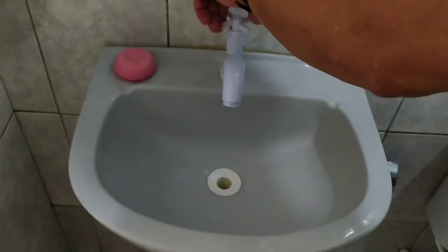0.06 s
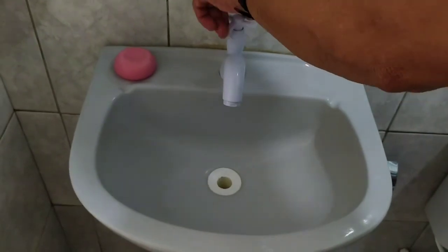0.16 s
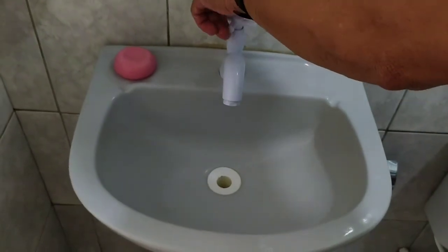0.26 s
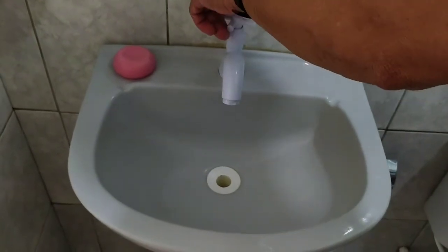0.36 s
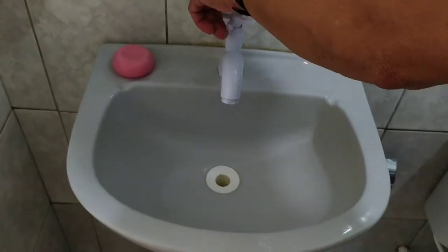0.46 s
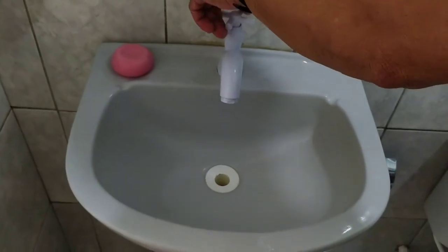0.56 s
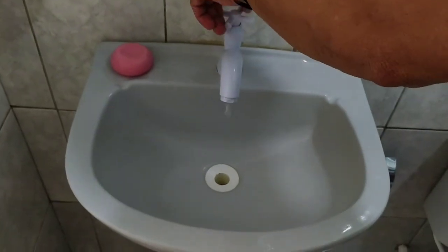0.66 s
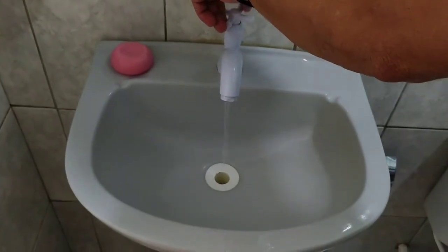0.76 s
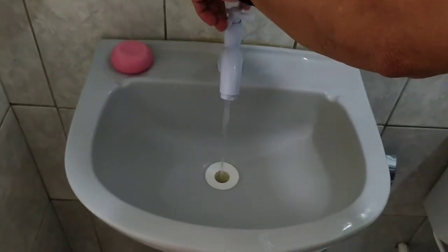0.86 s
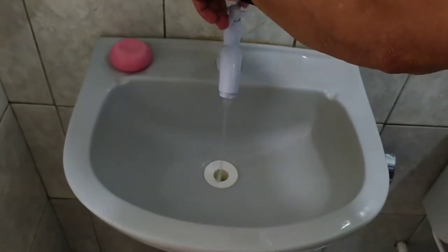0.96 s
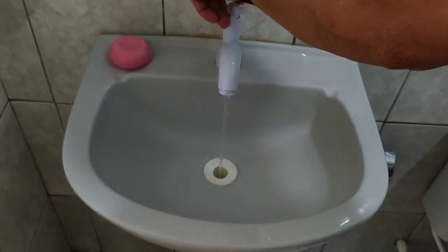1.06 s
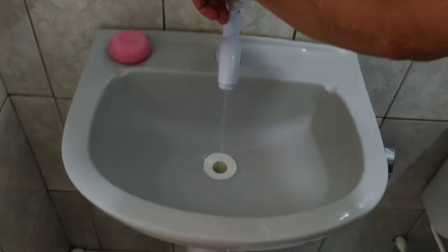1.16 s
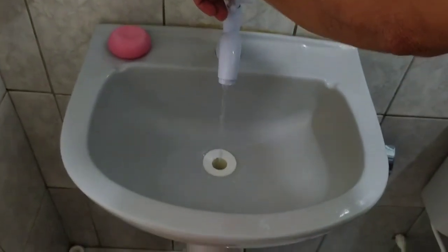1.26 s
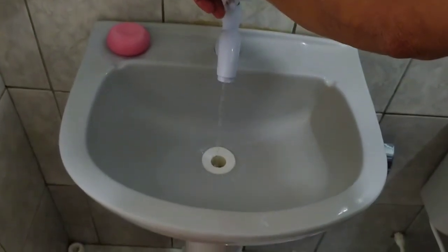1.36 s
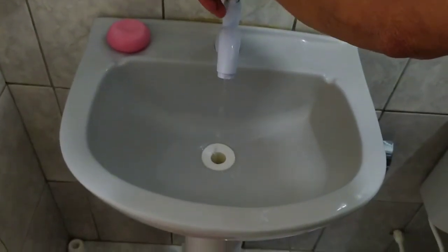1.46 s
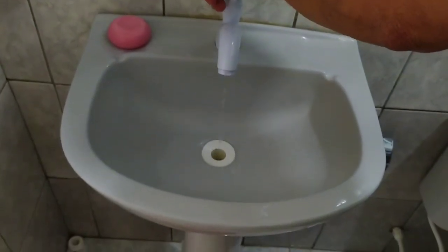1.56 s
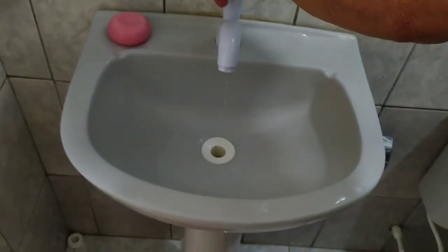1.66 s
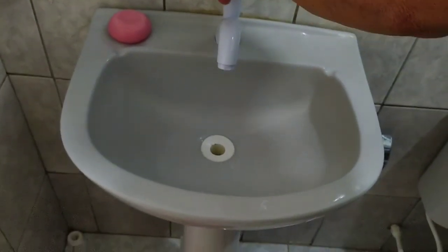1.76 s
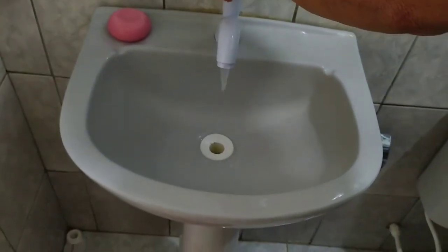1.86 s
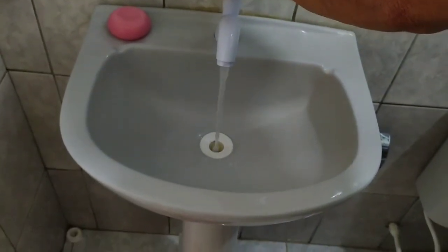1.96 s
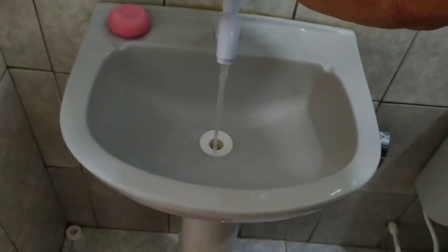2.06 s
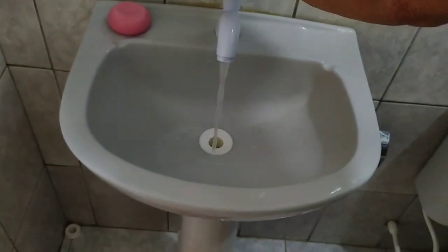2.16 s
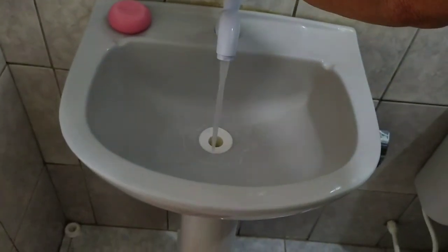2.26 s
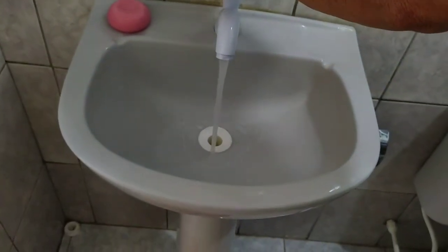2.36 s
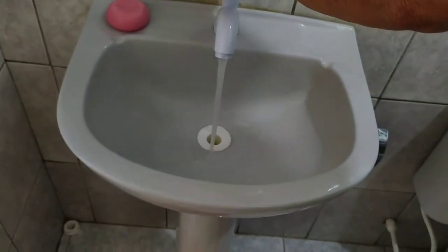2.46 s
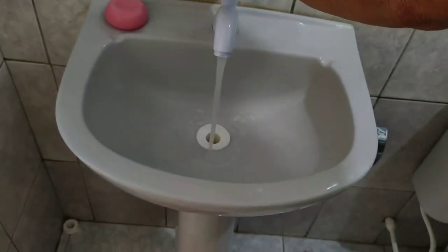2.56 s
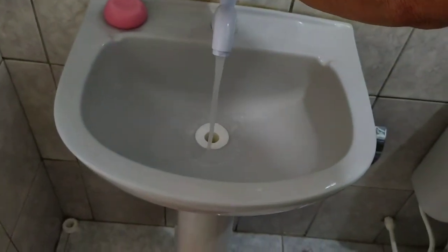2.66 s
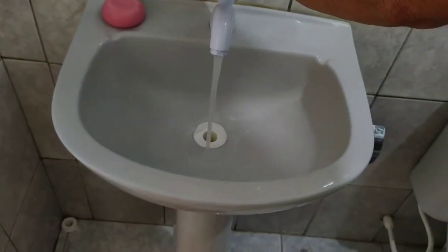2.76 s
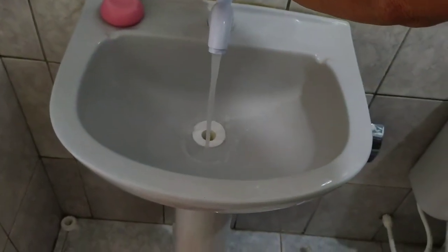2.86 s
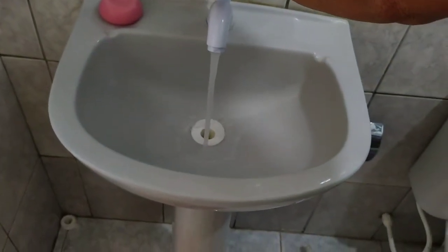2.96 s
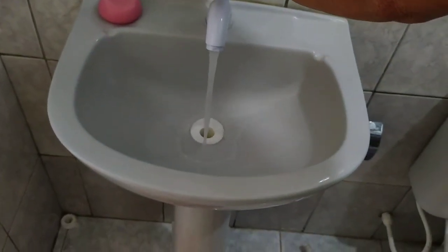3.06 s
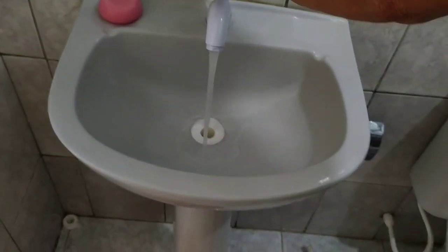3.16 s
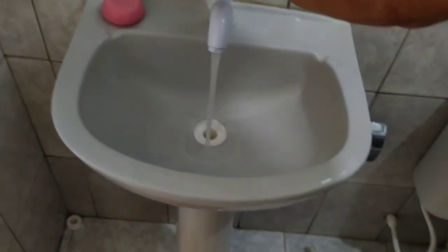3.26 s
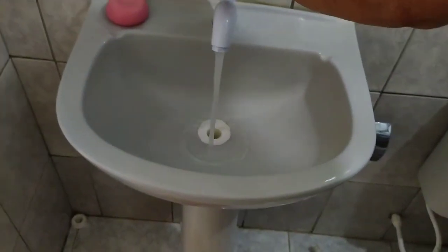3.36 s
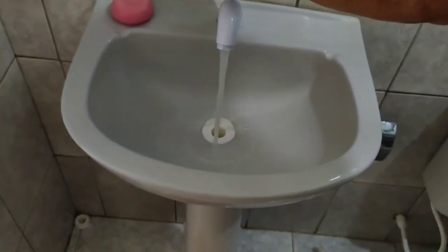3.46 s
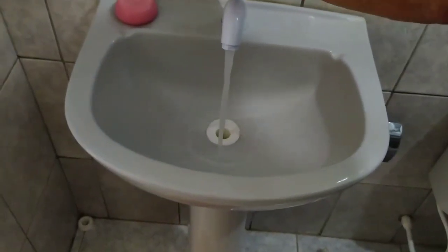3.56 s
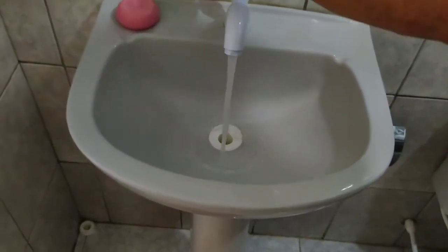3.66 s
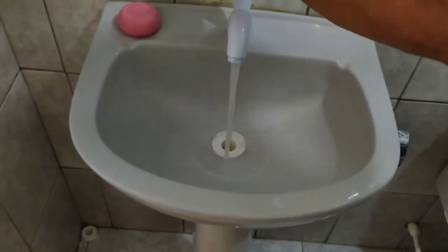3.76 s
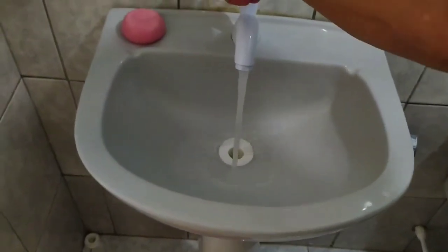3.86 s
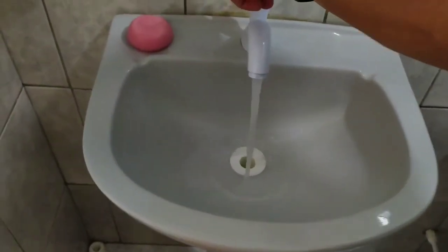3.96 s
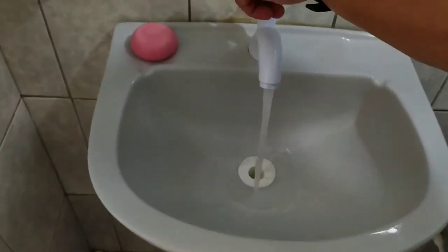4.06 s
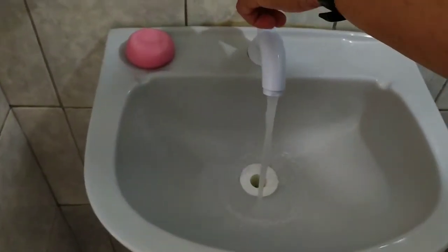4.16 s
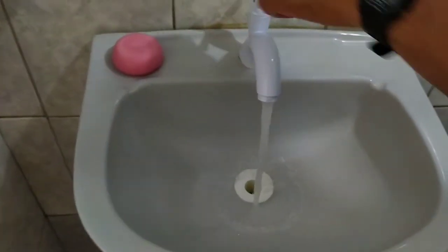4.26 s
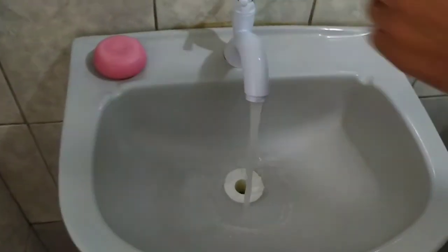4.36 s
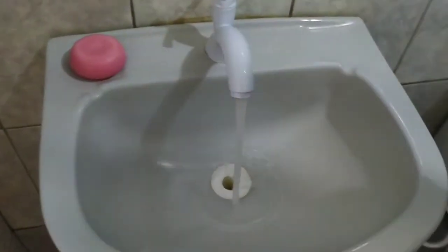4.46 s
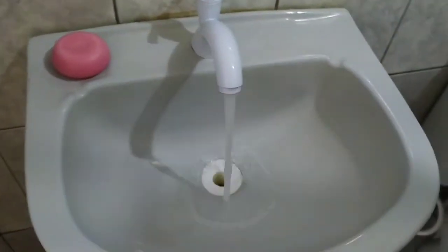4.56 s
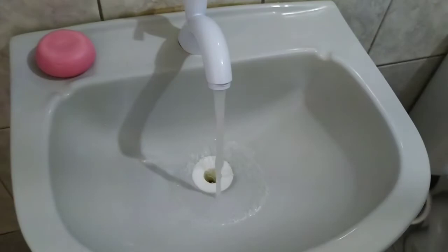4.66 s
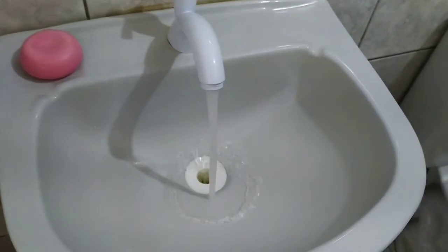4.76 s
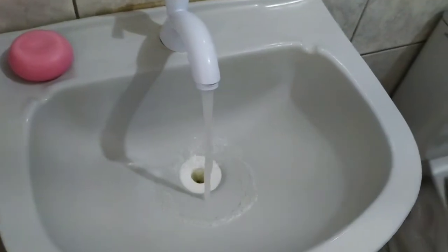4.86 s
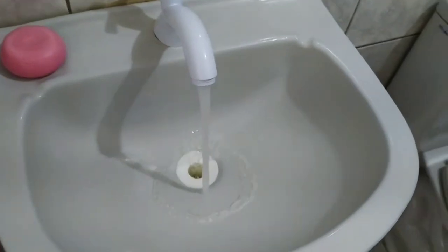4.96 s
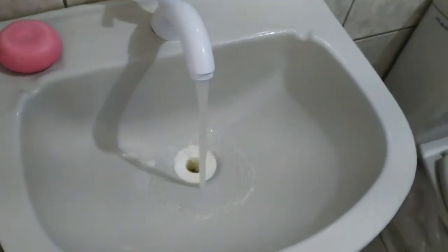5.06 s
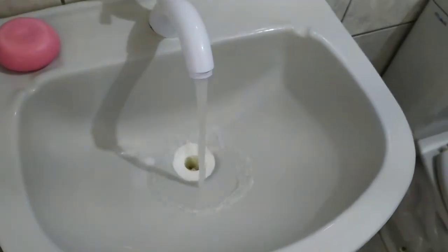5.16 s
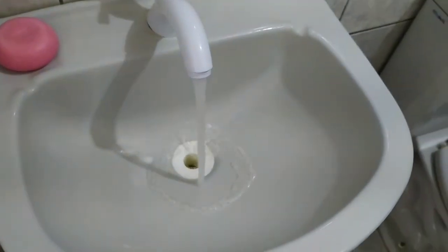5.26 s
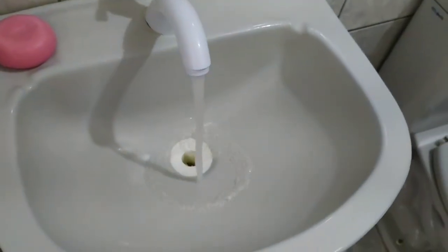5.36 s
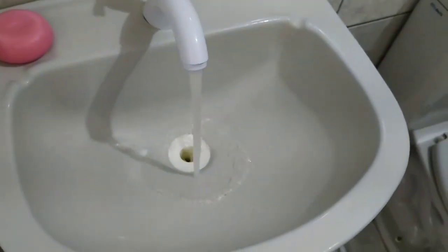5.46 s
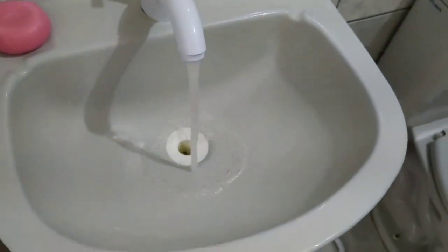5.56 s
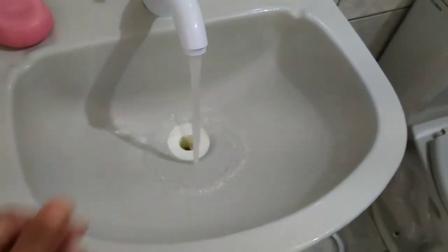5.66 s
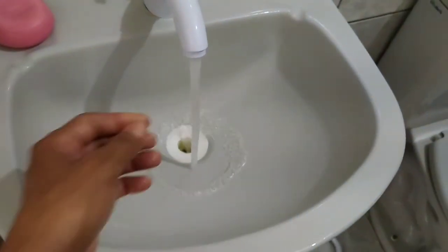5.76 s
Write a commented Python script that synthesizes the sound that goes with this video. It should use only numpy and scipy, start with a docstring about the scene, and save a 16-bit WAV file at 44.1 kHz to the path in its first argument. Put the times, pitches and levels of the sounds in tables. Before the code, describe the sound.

Close stereo view of a sink: first a quick, torn burst of hissing air with whistling pipe tones, then almost quiet trickling with isolated drips and spits. The water returns with a slap, becomes a crisp continuous patter, and strengthens after brief hollow tap rattles. Bubbles, glugs and dull bowl drumming sit beneath the bright spray. The hard-walled bathroom adds a short reflection; a low hum is barely heard.

```python
"""A new plastic tap is opened over a ceramic basin in a small tiled bathroom with a faint low hum.
First, trapped air spits out: torn noise excites pipe and nozzle resonances, and an air column sounds.
The water thins to a dribble, then builds to a jet: patter noise sizzles, bubbles splash and gurgle.
The tap judders in small ticks and short hollow swells; as it opens further, water washes over the bowl.
The full jet drums on the bowl, with slaps, plops and glugs; late on, one soft, low rub is heard."""
import sys
import numpy as np
from scipy import signal
from scipy.fft import rfft, irfft, next_fast_len
from scipy.io import wavfile
from scipy.ndimage import uniform_filter1d

SR = 44100
rng = np.random.default_rng(int(sys.argv[2]) if len(sys.argv) > 2 else 0)


def unload_audio(sound):
    """Save the sound as a 16-bit wav file, at the path given as the first command line argument."""
    columns = np.transpose(np.atleast_2d(sound))
    # keep every value between -1 and 1, then stretch to whole-number steps
    steps = np.round(np.clip(columns, -1, 1) * 32767)
    wavfile.write(sys.argv[1], SR, steps.astype(np.int16))


N = 256220  # length in samples

# All levels in the tables are relative; the layers are weighted again where they are mixed.
# Spectrum of the room tone. Each row: frequency in Hz, density in dB per Hz.
AIR_SPECTRUM = [(20, 11), (40, -9), (70, 5.5), (100, -7), (130, -53), (300, -50), (700, -27.5), (2000, -6),
                (5000, -18.5)]
# Course of a low hum in the room. Each row: time in seconds, level in dB.
HUM_LEVEL = [(0.0, -44.5), (0.7, -53), (0.93, -45.5), (2.4, -55.5), (2.55, -50)]
# Spectrum of a soft rub. Each row: frequency in Hz, density in dB per Hz.
RUB_SPECTRUM = [(25, -12), (70, 9), (130, -11), (300, -1), (600, 2), (1000, -15), (2000, -38)]
# Reverberation of the tiled walls. Each row: frequency in Hz, time to decay by 60 dB in seconds.
TILE_DECAY = [(150, 0.39), (1000, 0.24), (4000, 0.17), (14000, 0.035)]
# Likeness of left and right. Each row: frequency in Hz, correlation as a plain number.
LIKENESS = [(30, .4), (120, .9), (400, .93), (750, .72), (1300, .4), (1900, .25), (3300, .22), (5200, .3),
            (6700, .15), (7100, .82), (8600, .95), (10200, .95), (11300, .38), (15000, .2)]
# Level difference of the sides. Each row: frequency in Hz, left minus right in dB.
SIDE_DIFFERENCE = [(250, .5), (800, .5), (2000, 3.2), (3900, 2.8), (4800, 0), (6000, 1.3), (9500, -.7),
                   (10200, 2), (11200, 12), (12300, 11.5), (14000, 8), (15500, 9)]
# Lateness of the left side. Each row: frequency in Hz, lag in cycles.
LEFT_LAG = [(750, 0), (1300, .13), (2000, .25), (3300, .27), (4300, .47), (5400, .53), (6200, .9),
            (7000, 1)]
TOP_HZ = 15900  # band limit

# Puffs of trapped air leaving the spout. Each row: start in seconds, length in seconds,
# hiss level in dB, pipe level in dB, thump level in dB.
AIR_PUFFS = [(0.018, 0.037, -22, -28.5, -35.5), (0.054, 0.033, -16, -24, -52),
             (0.092, 0.025, -20, -26, -27), (0.16, 0.025, -24, -27.5, -46),
             (0.18, 0.0055, -17, -24.5, -33.5), (0.21, 0.053, -25, -30, -42), (0.27, 0.04, -37, -40, -46)]
PUFF_ATTACK_S, PUFF_RELEASE_S, THUMP_LAG_S = 0.0051, 0.035, 0.004  # the low modes answer late
# Spectrum of the spitting. Each row: frequency in Hz, density in dB per Hz.
SPIT_SPECTRUM = [(700, -46), (1000, -19), (3300, -8), (5500, -14), (7000, -3), (8600, -4), (10500, 2),
                 (12000, 1), (13500, -6.5), (15800, -15)]
# Resonances of the air in the pipe. Each row: frequency in Hz, width in Hz, level in dB.
PIPE_MODES = [(1065, 60, -4), (1258, 30, 1), (1335, 35, 3.5), (1480, 37, 6.5), (2240, 50, 6.5),
              (2335, 70, 2), (2900, 90, -2), (3160, 64, 6.5), (3310, 130, 1), (3800, 200, 1.5),
              (4030, 120, -2), (4350, 90, -3), (4970, 60, -5), (5500, 160, -4)]
# Resonances of the nozzle's whistling mouth. Each row: frequency in Hz, width in Hz, level in dB.
NOZZLE_MODES = [(6570, 290, -4.5), (6820, 45, 7), (7610, 53, 4), (8240, 290, 4.5), (9000, 720, 3.5),
                (9380, 86, 6), (9730, 250, -1), (10730, 150, 2), (11100, 330, -3), (12800, 150, -22),
                (13400, 60, -20)]
# Low modes of pipe and basin. Each row: frequency in Hz, width in Hz, level in dB.
THUMP_MODES = [(157, 29, -4), (218, 97, -3), (330, 76, -1), (420, 91, -2.5), (555, 65, -18)]
COLUMN_HZ, COLUMN_DB, COLUMN_WAVER = 356, -6, 0.009  # mean pitch, level, rms waver as a share of pitch
# Big air pockets, first in the pipe, later in the drain. Each row: start in seconds, peak level in dB,
# starting pitch in Hz, time to peak in seconds, pitch glide in octaves per second.
AIR_GLUGS = [(0.032, -36, 206, 0.006, 1), (0.057, -36, 225, .01, -5), (0.103, -37.5, 228, 0.014, -9.5),
             (0.137, -40, 215, 0.0057, -6), (0.187, -35, 204, 0.0051, 5), (3.576, -37.5, 435, 0.0027, 6),
             (3.634, -45, 215, 0.01, -1), (4.055, -44.5, 430, 0.026, 1.5), (4.42, -45.5, 212, 0.012, 1),
             (4.479, -40, 423, 0.011, 2.5), (4.82, -42, 221, 0.0098, -9), (5.145, -49, 188, 0.012, -11),
             (5.483, -47, 422, 0.027, 1.5), (5.715, -40.5, 424, 0.02, 2)]

# Runs in which the turned tap sticks and slips. Each row: start in seconds, number of jolts,
# jolts per second, body level in dB, tick level in dB.
JUDDER_RUNS = [(2.681, 1, 50, -30.5, -20), (2.7, 3, 78, -34, -46), (2.7364, 3, 93, -33.5, -35),
               (2.7725, 1, 50, -33, -27), (2.7894, 2, 83, -33.5, -23.5), (2.816, 2, 63, -30.5, -23),
               (2.8443, 1, 50, -39, -20), (2.857, 3, 60, -38, -44), (2.962, 3, 47, -35.5, -45),
               (3.055, 1, 50, -39, -48), (3.126, 1, 50, -37.5, -42), (3.183, 1, 50, -46, -50),
               (3.2623, 1, 50, -37, -24)]
# Modes of the tap's hollow body, swelling after each jolt. Each row: frequency in Hz before scatter
# and sag, level in dB, delay in seconds, width in seconds.
TAP_MODES = [(268, -1.8, .0018, .0033), (325, -16, .009, .008), (190, -15, .003, .005),
             (840, -2, .004, .0022), (640, -14, .006, .002)]
JOLT_SCATTER_S, JOLT_SCATTER_DB, JOLT_PITCH_SCATTER = .0007, 1.3, .045  # rms; pitch as a share
TICK_HZ, TICK_WIDTH_S, SAG_OCTAVES_PER_S = 1750, .0003, .15  # the slip itself; the body's sinking pitch
JOLT_ROOM_DB = -11  # the tap is close, so its jolts stay dry

# Spectrum of water sheeting over the glaze. Each row: frequency in Hz, density in dB per Hz.
WASH_SPECTRUM = [(150, -21), (300, -10), (600, -6.5), (1100, -4), (1700, 1.5), (2800, 3.5), (3700, 0),
                 (5000, -27)]
# Slugs of water hitting the glaze. Each row: start in seconds, crack level in dB,
# low splash in dB against the crack's level.
WATER_SLAPS = [(0.566, -37, -4), (0.728, -47, -5), (0.826, -20, -22), (0.853, -45, -8), (1.045, -49, -9),
               (1.519, -43, 3), (1.57, -26.5, -30), (1.638, -43, -3), (1.712, -37, -5), (1.815, -22.5, -7),
               (1.911, -24, -24), (1.954, -35, -6), (2.016, -9, -12.5), (2.045, -24, -4), (2.199, -11, -8),
               (2.36, -29, -2), (2.523, -11.5, -14), (3.132, -25, -5), (3.33, -18, -12), (3.434, -12, -27),
               (3.506, -10, -14), (3.972, -9.5, -12.5), (4.226, -24, -24), (4.401, -10, -16),
               (4.503, -7.5, -33), (4.736, -20, -20), (4.821, -11, -10), (4.995, -8, -24),
               (5.262, -6.5, -18), (5.405, -8.5, -16), (5.454, -24, -18), (5.494, -8, -23),
               (5.613, -13, -10), (5.762, -11.5, -12)]
# Air pockets closing in the pool and at the drain. Each row: start in seconds, level in dB before
# scatter, pitch in Hz before a small common lowering and the rise.
AIR_PLOPS = [(1.519, -25, 2980), (1.64, -28, 2340), (1.681, -21, 3000), (2.046, -12, 2850),
             (2.36, -12, 2890), (2.925, -21, 1510), (2.977, -16.5, 1580), (3.133, -5.5, 3500),
             (3.434, -11.5, 3620), (3.634, -20, 1560), (3.762, -27, 1200), (3.842, -21, 1250),
             (3.9464, -20, 1570), (3.977, -21, 1310), (4.028, -18, 1230), (4.094, -18, 1290),
             (4.181, -20, 2150), (4.212, -20.5, 1274), (4.4025, -16, 1170), (4.428, -21, 1250),
             (4.8214, -20.5, 1242), (5.262, -18.5, 1237), (5.311, -18.5, 1275), (5.3779, -24.5, 960),
             (5.4048, -24, 1250), (5.51, -38, 1280), (5.6114, -18.5, 1220), (5.71, -28, 1180),
             (5.771, -22, 1290)]

# The stream from dribble to full jet. Each row: time in seconds, spray on the glaze in dB,
# splash in the pool in dB.
STREAM_LEVELS = [(0, -37, -39), (0.35, -33, -39.5), (0.52, -39, -52), (1.05, -42, -51), (1.42, -44, -52.5),
                 (1.6, -47.5, -79), (1.7, -47.5, -49), (1.725, -41.5, -42), (2.012, -38, -50.5),
                 (2.04, -29.5, -37.5), (2.3, -30.5, -40), (2.48, -31, -40.5), (2.8, -29.5, -40.5),
                 (3.3, -28, -36), (3.47, -27, -39.5), (3.6, -25, -36.5), (3.85, -23.5, -35.5),
                 (3.92, -26.5, -33.5), (4.0, -24, -34.5), (4.3, -23.5, -39), (4.55, -25, -39.5),
                 (4.7, -23.5, -39), (5.3, -24.5, -39.5), (5.55, -22.5, -37), (5.63, -27, -37),
                 (5.81, -23, -38)]
# Gulps, when the stream drags air into the pool and drums on the bowl. Each row: start in seconds,
# length in seconds, splash level in dB, gurgle level in dB, drumming level in dB.
AIR_GULPS = [(0.485, 0.024, -67, -42, -67), (0.562, 0.031, -43.5, -36.5, -72),
             (0.724, 0.012, -41.5, -29.5, -53), (0.851, 0.025, -47, -34.5, -55),
             (1.045, 0.013, -45, -39, -58), (1.3, 0.04, -67, -55, -54.5), (1.72, 0.28, -52, -37.5, -55.5),
             (1.812, 0.026, -51, -34, -60), (1.875, 0.027, -55, -34, -62), (1.945, 0.025, -49, -33, -56),
             (2.02, 0.015, -35.5, -30.5, -51), (2.1, 0.03, -43, -32.5, -48.5),
             (2.445, 0.023, -34, -55, -46), (2.545, 0.029, -32, -38.5, -70),
             (2.648, 0.044, -31.5, -33.5, -68), (2.738, 0.012, -28.5, -30, -66),
             (2.82, 0.05, -37, -40, -46), (2.905, 0.1, -34.5, -43.5, -54), (3.13, 0.025, -35, -62, -66),
             (3.29, 0.075, -34.5, -43, -56), (3.585, 0.042, -32, -31.5, -50),
             (3.64, 0.019, -49.5, -35.5, -62), (3.68, 0.044, -34.5, -38, -75),
             (3.77, 0.019, -27.5, -34.5, -67), (3.96, 0.12, -34.5, -38, -73), (4.07, 0.17, -33, -41, -56),
             (4.345, 0.018, -33.5, -54, -68), (4.402, 0.033, -30.5, -33, -53),
             (4.465, 0.018, -28, -30.5, -53), (4.555, 0.019, -33.5, -52, -69), (4.815, 0.11, -36, -41, -60),
             (4.94, 0.054, -35.5, -37, -73), (5.125, 0.031, -39, -38.5, -63), (5.26, 0.074, -38, -49, -58),
             (5.37, 0.041, -36.5, -36, -70), (5.48, 0.088, -37.5, -37, -73),
             (5.705, 0.014, -29.5, -38, -47), (5.765, 0.023, -31, -47, -49)]
GULP_ATTACK_S, GULP_RELEASE_S = 0.00053, 0.0025
DRUM_LAG_S = 0.0068  # the bowl answers a gulp a little later
DRUM_DB, DRUM_KNEE_DB = -58, -45  # steady drumming; it fades once the spray is weaker than the knee
# Spectrum of drumming on the bowl. Each row: frequency in Hz, density in dB per Hz.
BOWL_SPECTRUM = [(90, -40), (130, -8), (180, -3), (260, -4), (330, -5), (450, -9.5), (560, -7.5),
                 (750, -15), (1100, -14.5)]
# Ringing modes of the bowl. Each row: frequency in Hz, width in Hz, level in dB.
BOWL_RESONANCES = [(343.6, 8.4, 4), (439, 25, -1), (520, 29, -30)]
# Course of the bowl's ringing. Each row: time in seconds, level in dB.
BOWL_RING_LEVEL = [(0.35, -50), (0.9, -53), (1.38, -51.5), (1.48, -88), (1.68, -56), (1.75, -55.5),
                   (2.55, -58.5), (2.62, -72), (3.3, -57), (5.1, -59.5), (5.8, -44.5)]
# Spectrum of the full stream's splash. Each row: frequency in Hz, density in dB per Hz.
SPLASH_SPECTRUM = [(940, -23), (1600, -2.5), (2050, -3.5), (2900, 0), (3700, 2), (4200, 6), (4700, 1.5),
                   (5500, 3.5), (6200, 9), (7300, 6.5), (10000, -60)]
# Duller splash of a thin stream. Each row: frequency in Hz, density in dB per Hz.
DRIBBLE_SPECTRUM = [(940, -19), (1600, -1), (2100, -1), (2900, -0.5), (3500, -2.5), (4300, 0), (5500, 1),
                    (6200, 5.5), (7300, -10), (10000, -60)]
# Spectrum of the gurgle. Each row: frequency in Hz, density in dB per Hz.
GURGLE_SPECTRUM = [(550, -40), (780, -22), (900, -8), (1020, -2.5), (1230, 0), (1550, -3), (1900, -12),
                   (2600, -35)]
# Resonances of the nearly empty drain. Each row: frequency in Hz, width in Hz, level in dB.
DRAIN_MODES = [(925, 70, 3), (1080, 100, 1), (1350, 200, -4)]
GURGLE_DB = -6  # envelope of the steady gurgle against that of the steady splash
# Spurts of the jet. Each row: start in seconds, length in seconds, level in dB against the steady spray.
JET_SPURTS = [(0.825, 0.086, -0.5), (1.06, 0.023, 6.5), (1.4, 0.013, 7), (1.568, 0.014, 5.5),
              (1.725, 0.011, 6), (1.91, 0.023, 0), (2.1, 0.011, 6), (2.195, 0.052, -4), (2.535, 0.037, 5.5),
              (2.652, 0.027, 6.5), (2.84, 0.11, -1), (2.94, 0.049, 3.5), (3.17, 0.031, 4), (3.33, 0.024, 2),
              (3.51, 0.024, 0), (3.59, 0.02, 1), (3.795, 0.026, -2), (3.972, 0.077, -4),
              (4.215, 0.012, -0.5), (4.4, 0.044, 3.5), (4.48, 0.018, -3), (5.395, 0.019, -1),
              (5.535, 0.021, -1)]
SPURT_ATTACK_S, SPURT_RELEASE_S = 0.0068, 0.022
# Spectrum of the sizzling spray. Each row: frequency in Hz, density in dB per Hz.
SPRAY_SPECTRUM = [(3500, -39.5), (5000, -16), (6000, -11), (7400, -0.5), (8700, 3), (10000, 4),
                  (11100, 1.5), (12500, -10.5), (14000, -15), (15800, -30)]
# Spectrum of the finest droplets. Each row: frequency in Hz, density in dB per Hz.
MIST_SPECTRUM = [(9000, -21.5), (11000, -44), (12000, 6), (13300, 2.5), (14500, -10), (15800, 2)]


def amp(db):
    """The amplitude ratio is ten to the power of a twentieth of the decibels."""
    return 10 ** (np.asarray(db) / 20)


def unit(x):
    """Normalisation divides a signal by its rms."""
    return x / np.sqrt(np.mean(x ** 2) + 1e-20)


def along(points, hz):
    """Interpolation of (Hz, value) points on a logarithmic frequency axis."""
    f, v = np.transpose(points)
    return np.interp(np.log(hz + 1), np.log(f + 1), v)


def levels(rows, fade=.04):
    """A gain curve for each dB column, decaying exponentially outside the rows' span."""
    s, *columns = np.transpose(rows)
    t = np.arange(N) / SR
    outside = np.abs(t - np.clip(t, s[0], s[-1]))
    return [amp(np.interp(t, s, column)) * np.exp(-outside / fade) for column in columns]


def swells(rows, attack, release, lag=0):
    """Event envelopes for each dB column: they rise, hold and decay, and overlaps add in power."""
    t = np.arange(SR) / SR
    power = np.zeros((len(rows[0]) - 2, N))
    for s, length, *db in rows:
        shape = (1 - np.exp(-t / attack)) * np.exp(-np.maximum(t - length, 0) / release)
        add(power, s + lag, (amp(db)[:, None] * shape) ** 2)
    return np.sqrt(power)


def filtered(x, response):
    """Linear filtering multiplies the spectrum by a frequency response."""
    m = next_fast_len(N + SR // 2)
    return irfft(rfft(x, m) * response(np.fft.rfftfreq(m, 1 / SR)), m)[..., :N]


def colour(points):
    """Spectral colouring: the response of a (Hz, dB) spectrum."""
    return lambda hz: amp(along(points, hz))


def resonances(modes):
    """Modal superposition: damped resonators of alternating sign, given as (Hz, width, dB)."""
    def response(f):
        total = 0
        for k, (centre, width, db) in enumerate(modes):
            damping = 1j * f * width
            total = total + (-1) ** k * amp(db) * damping / (centre * centre - f * f + damping)
        return total
    return response


def stereo(pair, response):
    """Partial correlation: two unrelated signals blend into left and right; their mean has rms 1."""
    def mid_side(hz):
        turn = np.arccos(np.clip(along(LIKENESS, hz), -.95, .98)) / 2
        return response(hz) * np.array([np.ones_like(hz), np.tan(turn)])
    mid, side = filtered(pair, mid_side)
    return np.array([mid + side, mid - side]) / np.std(mid)


def noise():
    """Two uncorrelated white noises."""
    return rng.standard_normal((2, N))


def patter(rate, life, bed):
    """Shot process: random impacts per second, each decaying over life seconds, on an even bed."""
    hits = (rng.random(N) < rate / SR) * rng.exponential(size=N)
    power = signal.lfilter([1], [1, -np.exp(-2 / (life * SR))], hits)
    return unit(np.sqrt(power / power.mean() + abs(bed)))


def sputter(rate, unevenness, life, bed):
    """Nearly periodic relaxation: slugs start abruptly and decay over life seconds, on an even bed."""
    gaps = np.exp(unevenness * rng.standard_normal(N // 100)) / rate
    starts = np.cumsum(gaps) - gaps[0]
    t = np.arange(N) / SR
    age = t - starts[np.searchsorted(starts, t, side="right") - 1]
    return unit(np.exp(-age / life) + bed)


def patchy(x, depth_db, size):
    """Time-varying filtering: random colour drifts in patches of size (bins, frames)."""
    z = signal.stft(x, nperseg=256)[2]
    field = rng.standard_normal(z.shape[1:])
    for axis in (0, 1, 1):  # smoothed twice in time
        field = uniform_filter1d(field, size[axis], axis)
    return signal.istft(z * amp(depth_db * unit(field)), nperseg=256)[1][:, :N]


def add(track, s, sound):
    """Superposition of a sound on a track from time s."""
    start = max(round(s * SR), 0)
    part = track[..., start:start + sound.shape[-1]]
    part += sound[..., :part.shape[-1]]


def bell(t, centre, width):
    """A Gaussian envelope."""
    return np.exp(-.5 * ((t - centre) / width) ** 2)


def bubble(t, hz, cycles, rise):
    """Bubble resonance: a damped ring whose pitch rises as the bubble nears the surface."""
    age = t * hz / cycles
    ring = np.sin(2 * np.pi * hz * t * (1 + rise * np.minimum(age, 10) / 2))
    return ring * np.exp(-age) * (1 - np.exp(-2 * t * hz))


def froth(centre_hz, octaves, spread_db, cycles, count):
    """A population of bubbles of random pitch and size, reaching the two sides at different strengths."""
    t = np.arange(SR // 100) / SR
    pitch, size, left, right = np.clip(rng.standard_normal((count, 4)), -2, 2).T[..., None]
    rings = amp(spread_db * size) * bubble(t, centre_hz * 2 ** (octaves * pitch), cycles, rise=.01)
    at = rng.integers(0, N, (count, 1)) + np.arange(len(t))
    sides = [np.bincount(at.ravel(), (rings * gain).ravel(), N)[:N] for gain in (left, right)]
    return unit(np.array(sides))


def room_tone(hum_hz=87, width_hz=7):
    """Narrow-band noise wavers as a faint low hum within the broadband noise of still air."""
    hum, = levels(HUM_LEVEL, fade=0.3)
    air = stereo(noise(), colour(AIR_SPECTRUM))
    tone = stereo(noise(), resonances([(hum_hz, width_hz, 0)]))
    return amp(-52.5) * air + amp(-11) * hum * tone


def tiled_room(x):
    """Reverberation: convolution with decaying noise, a new echo pattern for each third of a second."""
    out, step = np.zeros((2, N)), SR // 3
    for start in range(0, N, step):
        hz, t, (a, b) = signal.stft(rng.standard_normal((2, SR // 2)), SR, nperseg=256)
        alike = np.clip(along(LIKENESS, hz), -1, 1)[:, None]
        sides = np.array([a, alike * a + np.sqrt(1 - alike ** 2) * b])
        decay = amp(-60 * t / along(TILE_DECAY, hz)[:, None])
        tail = signal.istft(sides * decay, SR, nperseg=256)[1]
        tail = tail / np.linalg.norm(tail[0])
        add(out, start / SR + .004, signal.fftconvolve(x[:, start:start + step], tail, axes=1))
    return out


def rub(s=5.348, width=0.03, db=-43):
    """Friction noise: one soft, low rub under a Gaussian swell."""
    return amp(db) * bell(np.arange(N) / SR, s, width) * stereo(noise(), colour(RUB_SPECTRUM))


def air_column():
    """Impulsive excitation: each puff thumps the pipe and briefly sounds its wavering air column."""
    thump = swells(AIR_PUFFS, PUFF_ATTACK_S, PUFF_RELEASE_S, THUMP_LAG_S)[2]
    waver = unit(uniform_filter1d(rng.standard_normal(N), SR // 50))
    phase = 2 * np.pi * np.cumsum(COLUMN_HZ * (1 + COLUMN_WAVER * waver)) / SR
    note = np.sqrt(2) * np.sin(phase)
    return thump * (amp(COLUMN_DB) * note + amp(-8.5) * stereo(noise(), resonances(THUMP_MODES)))


def gush():
    """Forced resonance: compressed air tears the first water into slugs that ring pipe and nozzle."""
    hiss, pipe, _ = swells(AIR_PUFFS, PUFF_ATTACK_S, PUFF_RELEASE_S)
    slugs = sputter(rate=85, unevenness=.4, life=.003, bed=.3)
    tearing = unit(np.sqrt(slugs))
    spit = stereo(patchy(noise() * tearing, depth_db=5, size=(2, 30)), colour(SPIT_SPECTRUM))
    blows = patchy(noise() * unit(slugs ** 2), depth_db=2.5, size=(3, 10))
    low_ring = stereo(blows, resonances(PIPE_MODES))
    high_ring = stereo(noise() * tearing, resonances(NOZZLE_MODES))
    return amp(-4.5) * hiss * spit + amp(-7) * pipe * low_ring + amp(-2.0) * hiss * high_ring


def glugs():
    """Cavity oscillation: a big air pocket swells and fades while its pitch slides."""
    out, t = np.zeros(N), np.arange(SR // 5) / SR
    for s, db, hz, peak_s, glide in AIR_GLUGS:
        phase = 2 * np.pi * np.cumsum(hz * 2 ** (glide * t)) / SR
        age = t / peak_s
        add(out, s, amp(db) * (age * np.exp(1 - age)) ** 2.4 * np.sin(phase))
    return out


def judder():
    """Stick-slip: runs of jolts, each a small tick and a short swell of the tap's hollow body."""
    out, t = np.zeros(N), np.arange(-SR // 100, SR // 25) / SR

    def swell(hz, delay, width):
        return bell(t, delay, width) * np.sin(2 * np.pi * hz * t)

    for start, count, rate, body_db, tick_db in JUDDER_RUNS:
        for k in range(round(count)):
            late, force, detune = rng.standard_normal(3)  # no two jolts are alike
            s = start + k / rate + min(k, 1) * JOLT_SCATTER_S * late
            sag = 2 ** (-SAG_OCTAVES_PER_S * (s - JUDDER_RUNS[0][0]))  # sinks as the tap opens
            pitch = (1 + JOLT_PITCH_SCATTER * detune) * sag
            body = sum(amp(db) * swell(hz * pitch, delay, width) for hz, db, delay, width in TAP_MODES)
            tick = swell(TICK_HZ, 0, TICK_WIDTH_S)
            jolt = amp(body_db) * body + amp(tick_db) * tick
            add(out, s + t[0], amp(JOLT_SCATTER_DB * force) * jolt)
    return out


def surge(s=3.345, width=0.048, db=-38):
    """Flow noise: a sheet of water washes across the bowl as the tap opens further."""
    swell = bell(np.arange(N) / SR, s, width)
    wash = noise() * patter(rate=250, life=.003, bed=0.55)
    return amp(db) * swell * stereo(wash, colour(WASH_SPECTRUM))


def slaps(life=0.0054, low_life=0.011):
    """Impact noise: each slug of water gives a bright crack and a slower-decaying low splash."""
    t = np.arange(SR // 8) / SR
    crack, splash = np.zeros((2, N))
    for s, db, low_db in WATER_SLAPS:
        add(crack, s, amp(db) * np.exp(-t / life))
        add(splash, s, amp(db + low_db) * np.exp(-t / low_life))
    bright = stereo(noise(), colour(SPRAY_SPECTRUM))
    low = stereo(noise(), colour(SPLASH_SPECTRUM)) + amp(-18.5) * stereo(noise(), colour(GURGLE_SPECTRUM))
    return amp(-11) * crack * bright + amp(-8) * splash * low


def plops():
    """Bubble resonance: larger air pockets pinch off in the pool and at the drain."""
    out, t = np.zeros((2, N)), np.arange(SR // 20) / SR
    for s, db, hz in AIR_PLOPS:
        gain = amp(db - 12.5 + rng.normal(0, 2.4, (2, 1)))  # scattered on each side
        add(out, s, gain * bubble(t, hz * .95, cycles=8.4, rise=0.065))
    return out


def bowl():
    """Forced vibration: water drums on the bowl, harder with gulps, and keeps its low modes sounding."""
    spray = levels(STREAM_LEVELS)[0]
    gulps = swells(AIR_GULPS, GULP_ATTACK_S, GULP_RELEASE_S, DRUM_LAG_S)[2]
    steady = amp(DRUM_DB) * spray / np.hypot(spray, amp(DRUM_KNEE_DB))
    ring, = levels(BOWL_RING_LEVEL, fade=1.0)
    blows = noise() * patter(rate=100, life=0.0059, bed=0.26)
    drumming = np.hypot(steady, gulps) * stereo(blows, colour(BOWL_SPECTRUM))
    return amp(4.0) * drumming + amp(-7.0) * ring * stereo(noise(), resonances(BOWL_RESONANCES))


def pool(spectrum_scale=0.92):
    """Bubble acoustics: film and drain fizz and gurgle; the dribble is duller, its gurgle slightly higher."""
    steady = levels(STREAM_LEVELS)[1]
    gulp_splash, gulp_gurgle, _ = swells(AIR_GULPS, GULP_ATTACK_S, GULP_RELEASE_S)
    splash = np.hypot(steady, gulp_splash)
    gurgle = np.hypot(amp(GURGLE_DB) * steady, gulp_gurgle)
    fizz = noise() * patter(rate=400, life=.002, bed=.4)
    fizz = fizz + froth(3000, .5, spread_db=3.5, cycles=2, count=5000)
    film = patchy(fizz, depth_db=1.5, size=(2, 10))
    film = film + amp(-1) * froth(3400, .3, spread_db=3.5, cycles=7, count=1100)
    drain = noise() * patter(rate=110, life=.003, bed=.8)
    drain = drain + amp(-3) * froth(1318, .33, spread_db=1, cycles=3.5, count=1500)
    t = np.arange(N) / SR
    strong = np.interp(t, [2.1, 3.6], [0, 1])  # share of the full jet
    joined = np.interp(t, [1.9, 2.4], [0, 1])  # share of the stream that falls unbroken
    # a scale below 1 shifts the spectrum upward
    shifted = stereo(drain, lambda hz: colour(GURGLE_SPECTRUM)(hz * spectrum_scale))
    early = amp(-2.5) * shifted + amp(-2.5) * stereo(noise(), resonances(DRAIN_MODES))
    gurgling = (1 - strong) * early + strong * stereo(drain, colour(GURGLE_SPECTRUM))
    dull = amp(-0.5) * stereo(film, colour(DRIBBLE_SPECTRUM))
    splashing = (1 - joined) * dull + joined * stereo(film, colour(SPLASH_SPECTRUM))
    return amp(-3.0) * splash * splashing + amp(-11.5) * gurgle * gurgling


def jet():
    """Random impacts: droplets sizzle on the glaze, the finest of them as a high mist."""
    spurts, = swells(JET_SPURTS, SPURT_ATTACK_S, SPURT_RELEASE_S)
    spray = levels(STREAM_LEVELS)[0] * np.hypot(1, spurts)
    lumps = patter(rate=220, life=0.0066, bed=7.3)  # the jet arrives in lumps
    droplets = patter(rate=950, life=0.0027, bed=1.0)
    fine_droplets = patter(rate=770, life=0.0059, bed=0.7)
    sizzle = patchy(noise() * lumps * droplets, depth_db=2.06, size=(4, 7))
    mist = patchy(noise() * lumps * fine_droplets, depth_db=6.5, size=(3, 9))
    sizzle = amp(-2.0) * stereo(sizzle, colour(SPRAY_SPECTRUM))
    return spray * (sizzle + amp(-15.0) * stereo(mist, colour(MIST_SPECTRUM)))


def scene():
    """Superposition of tap, water and basin with the bathroom's reverberation."""
    water = gush() + jet() + pool() + surge() + bowl() + slaps() + plops()
    plumbing, jolts = air_column() + glugs(), judder()
    room = amp(-2.5) * tiled_room(water + amp(-5.0) * plumbing + amp(JOLT_ROOM_DB) * jolts)
    return water + plumbing + jolts + room + rub() + room_tone()


def record(dry):
    """Interaural difference: the left lags, mostly with more treble, at equal summed level; band-limited."""
    def response(hz):
        lean = amp(np.outer([.5, -.5], along(SIDE_DIFFERENCE, hz)))
        alike = along(LIKENESS, hz)
        phase = 2 * np.pi * along(LEFT_LAG, hz)
        # the lag weakens the sum of the sides; dividing by this restores it
        summed = lean.mean(axis=0) * np.sqrt((1 + alike * np.cos(phase)) / (1 + alike))
        return lean * np.exp(-1j * np.outer([1, 0], phase)) / summed * (hz < TOP_HZ)
    return filtered(dry, response)


dry = scene()
out = record(dry)
unload_audio(out)
```